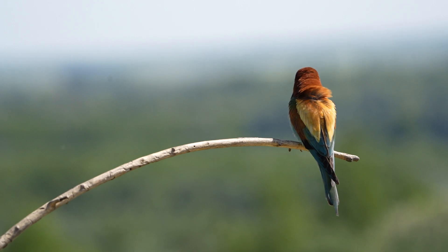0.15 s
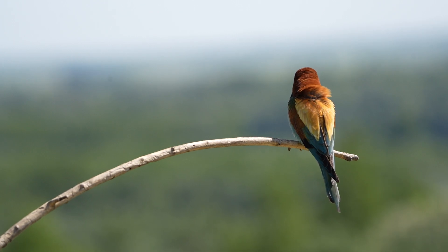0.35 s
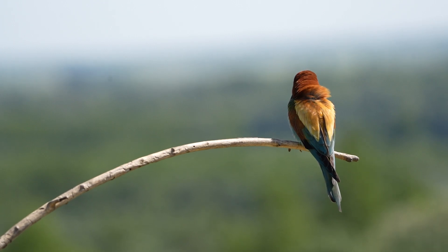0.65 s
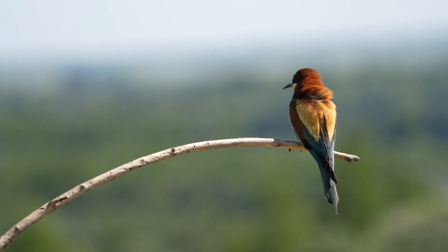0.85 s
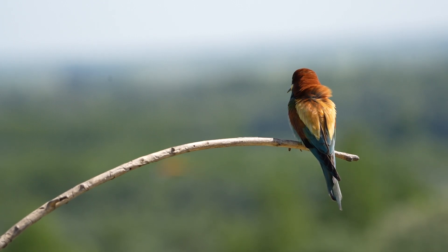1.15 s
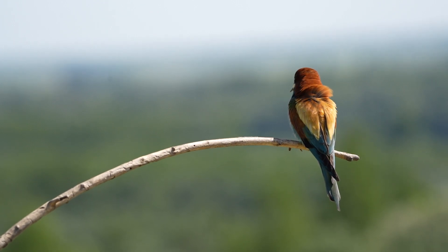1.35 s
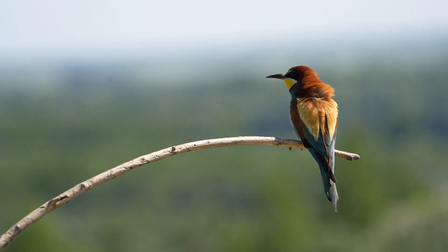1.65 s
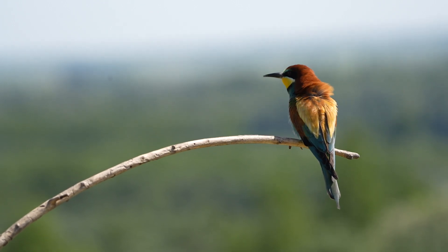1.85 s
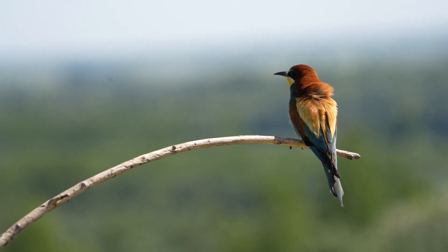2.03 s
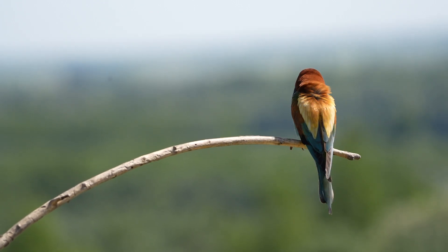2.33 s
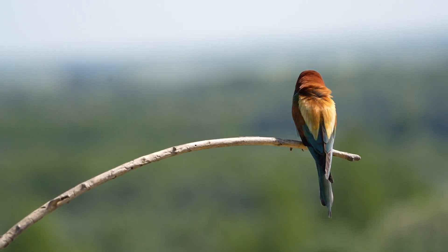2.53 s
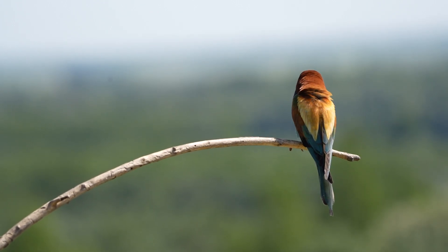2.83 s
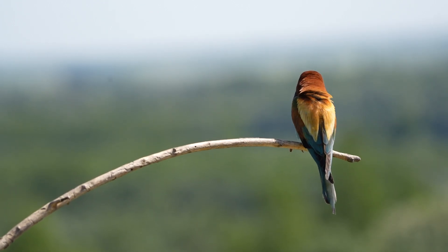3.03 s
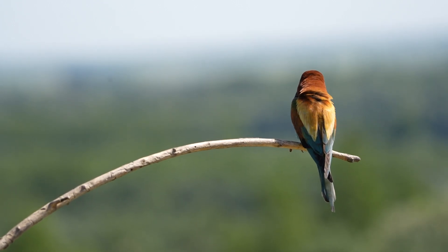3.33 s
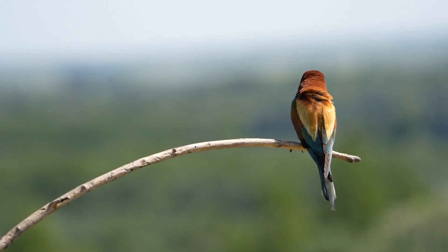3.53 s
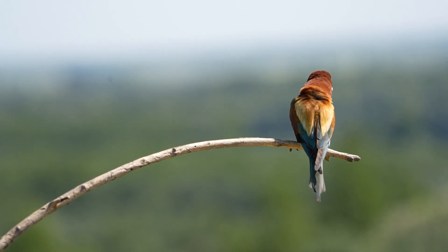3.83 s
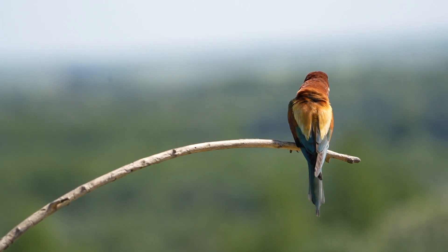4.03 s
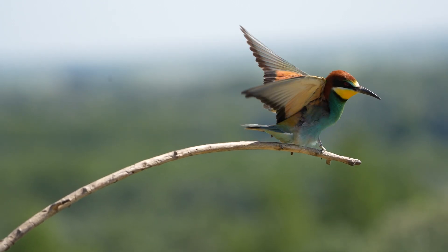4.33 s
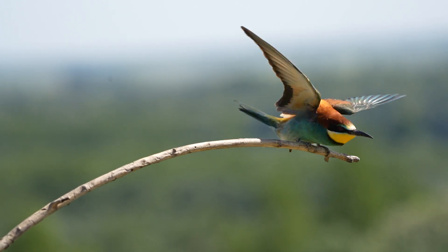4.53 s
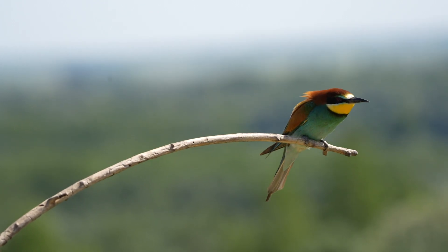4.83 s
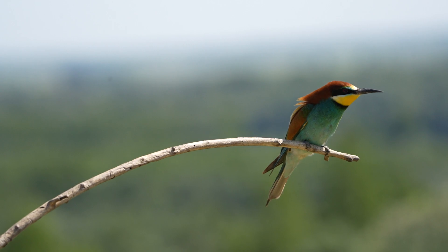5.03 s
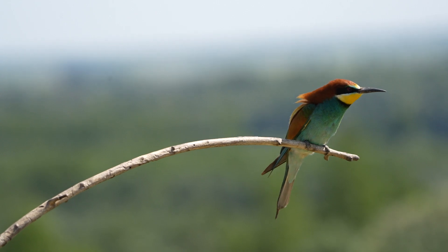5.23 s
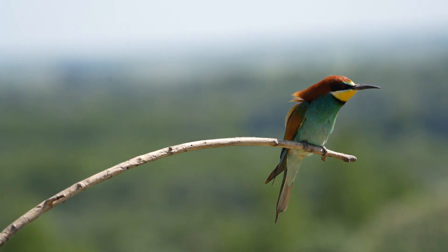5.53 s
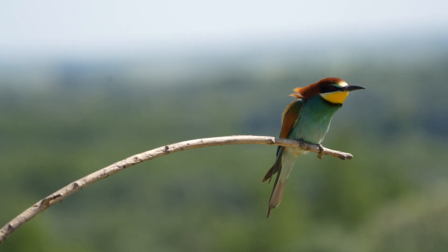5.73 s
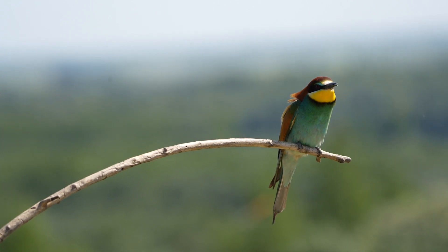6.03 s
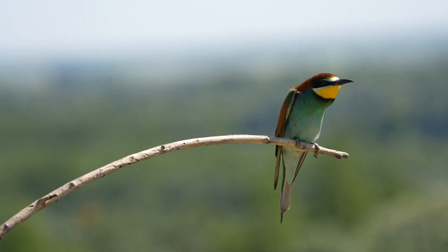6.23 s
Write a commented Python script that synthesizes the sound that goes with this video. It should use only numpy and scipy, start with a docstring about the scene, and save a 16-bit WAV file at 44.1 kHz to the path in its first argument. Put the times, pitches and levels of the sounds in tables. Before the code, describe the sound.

Outdoors in open country, a rolling bee-eater whistle and a sharp sparrow chirp begin together. Softer colony whistles scatter around, densest near three seconds, between further loud bee-eater calls and repeated chirps. Barely audible wing-like puffs, dry ticks and small rasps slip in. A steady far road murmur leans right beneath, swelling gently in the middle; stereo microphone close to the main bird, with slight hiss.

```python
"""A close bee-eater's rolling whistle and a sparrow's chirp on the left open the scene, in open countryside.
The colony answers further off in short arched whistles; all whistles are phasors with gliding pitch.
Pulse trains rasp, decaying sines tick close by, noise puffs whoosh softly, perhaps from wings.
Scattered echoes follow the birds. A distant road, shaped noise, drones on the right over microphone hiss."""
import sys
import numpy as np
from scipy import signal
from scipy.fft import rfft, irfft, next_fast_len
from scipy.io import wavfile
from scipy.ndimage import uniform_filter1d, map_coordinates

SR = 44100
rng = np.random.default_rng(int(sys.argv[2]) if len(sys.argv) > 2 else 0)


def dump_mix(stems):
    """Bounce the given channels to the path in sys.argv[1] as a 16-bit WAV at rate SR."""
    frames = np.atleast_2d(stems).T  # one column per channel
    limited = np.clip(frames, -1, 1)  # hard clip at full scale
    pcm = np.round(limited * 32767).astype(np.int16)
    wavfile.write(sys.argv[1], SR, pcm)


N = 281358

# Close bee-eater's calls: start t/s, end t/s, held f/Hz, level/dB before throat, left-right/dB, overtones/dB
NEAR_CALLS = [(-.033, 0.045, 1883, -11.5, 0.5, -53), (1.578, 1.644, 1773, -12, -0.5, -57),
              (2.238, 2.302, 1753, -10.5, -0.5, -54), (4.161, 4.264, 1846, -11.5, 0, -55.5),
              (4.336, 4.438, 1784, -23, -5, -65), (6.131, 6.236, 1803, -11, 0.5, -51)]
# Upward pitch flicks in them: crest t/s, crest f/Hz, rise/s, hold/s, fall/s, level change at crest/dB
ROLLS = [(-.002, 2355, 0.00404, .005, 0.0065, 2.5), (0.021, 2124, .004, 0.00384, 0.01, 1),
         (1.6177, 2278, 0.0053, .0035, 0.0074, -3), (2.2793, 2130, .008, 0.00088, 0.0073, -2.5),
         (4.1912, 2380, 0.0043, .006, 0.0046, 1.5), (4.213, 2277, .008, .0045, 0.012, 2),
         (4.24, 2228, 0.0083, 0.00094, 0.0095, -0.5), (4.359, 2063, 0.0022, .011, .005, 0.5),
         (4.404, 1950, 0.015, 0.013, 0.011, -0.5), (6.1606, 2344, 0.0037, .006, .006, -6.5),
         (6.184, 2276, 0.0083, 0.0049, 0.0061, -8), (6.209, 2020, 0.0088, 0.0025, .007, -5)]
# Close bee-eater's overtones: multiple of f, relative level/dB
OVERTONES = [(2, 1.5), (3, 0), (4, -14), (5, -17), (6, -19.5), (7, -22)]
# Its loudness against pitch: f/Hz, level/dB
THROAT = [(1300, -16.5), (1500, -15), (1650, -14), (1800, -4.5), (1950, 0.5), (2050, -0.5), (2250, -2),
          (2450, -4.5)]
# How the microphone ports take it: f/Hz, left-right/dB, left lead/rad
NEAR_SIDES = [(1500, -4, -.2), (1650, -6, 0), (1900, -5, -.1), (2100, -8, 0), (2250, -6, .8),
              (2400, -3, .6)]
START_HZ, SCOOP_HZ, SCOOP_S, ONSET_S = 1372, 1616, 0.00797, 0.0029  # fade in, quick scoop, then glide to held pitch
DROP_HZ, END_HZ, OVERTONES_FADE_DB = 1720, 1360, -1.5  # drop after last roll, end pitch, overtone change over a call

# Colony whistles: t/s, length/s, start f/Hz, crest f/Hz, end f/Hz, level/dB, left-right/dB, octave/dB
COLONY_CALLS = [(0.886, 0.04, 1940, 1930, 1880, -50.5, -2, -24),
                (0.949, 0.036, 1915, 1994, 1790, -45.5, -1, -17),
                (1.09, 0.03, 1820, 1940, 1780, -45, 2, -24),
                (1.196, 0.068, 1515, 1760, 1510, -48.5, -1, -24),
                (1.31, 0.03, 1400, 1770, 1680, -51, -18, -24),
                (1.674, 0.0334, 1464, 1793, 1760, -36.5, 9, -18),
                (1.742, 0.024, 1440, 1584, 1600, -37, 5, -26),
                (1.782, 0.03, 1680, 1850, 1600, -30.5, 6.5, -29),
                (2.125, 0.018, 1680, 2040, 1920, -46, -4, -24),
                (2.473, 0.024, 2160, 2460, 2040, -47.5, -14, -24),
                (2.526, 0.033, 1780, 1980, 1800, -42.5, -1, -31),
                (2.783, 0.037, 1720, 1900, 1580, -39, -18, -31),
                (2.851, 0.044, 1960, 2055, 1490, -38.5, -16, -35),
                (2.98, 0.03, 1880, 1910, 1800, -51, -2, -14),
                (3.038, 0.032, 1860, 2030, 1800, -45, -3, -26),
                (3.116, 0.0257, 1800, 2250, 1560, -31.5, -14, -37),
                (3.231, 0.046, 1600, 1800, 1510, -33.5, -20, -25),
                (3.279, 0.045, 1505, 1546, 1530, -40, -17, -27),
                (3.332, 0.03, 1620, 1714, 1440, -33.5, -16, -28),
                (3.87, 0.027, 1830, 2030, 1590, -42, -4, -24),
                (4.528, 0.014, 1400, 1590, 1750, -37, 11, -24),
                (4.541, 0.014, 1750, 2000, 1880, -35.5, 12, -28),
                (4.621, 0.036, 2070, 1930, 2020, -51, 3, -24),
                (4.657, 0.039, 1640, 2010, 1580, -41.5, -20, -24),
                (4.703, 0.022, 2040, 2070, 1990, -45, -4, -24),
                (4.728, 0.055, 1840, 2120, 1550, -40.5, -19, -24),
                (5.074, 0.037, 1730, 1830, 2150, -41, 13, -32),
                (5.109, 0.015, 1970, 1920, 1750, -37, 20, -24),
                (5.336, 0.028, 1860, 2310, 1810, -38.5, -4, -19),
                (5.376, 0.02, 1760, 2010, 1884, -42.5, -2, -24),
                (6.078, 0.051, 1684, 1780, 1720, -47.5, -2, -25),
                (6.326, 0.041, 2040, 1976, 1600, -38.5, 10, -38)]
CREST_SHARE, FAR_START_DB, FAR_END_DB, FAR_ONSET_S = .35, -2, -1.5, 0.0023  # crest at share of length; ends re crest

# Sparrow's chirps: t/s, arch/dB, burr/dB, rise/dB, pitch factor of arch and burr, pitch factor of rise
CHIRPS = [(-.01, -27.5, -29, -22, 1.02, 0.98), (1.097, -35, -32.5, -31, 0.99, .97),
          (2.213, -25, -30.5, -24, 1.006, 1.02), (3.174, -28, -31, -25, 1.036, 0.97),
          (3.815, -23.5, -25.5, -21, 1.017, 1.01), (4.571, -26, -28.5, -23.5, 1.004, .98),
          (5.254, -26.5, -28.5, -27, 1, 0.94), (5.99, -28, -27.5, -22.5, 1.01, 0.99)]
# Sparrow's three notes, before random detuning: t/s, f/Hz, level/dB
ARCH = [(0, 3960, -21), (.004, 4800, -5), (.0081, 5680, -5), (.0212, 5660, -7), (0.0266, 5780, -1),
        (0.03, 4800, -5.5), (0.0333, 3100, -20.5)]
BURR = [(0, 5420, -13), (.009, 5520, -28), (.013, 5050, -12.5), (.021, 4700, -12), (0.036, 5240, -12.5),
        (.0443, 5400, -16)]
RISE = [(0, 3200, -27), (.0088, 3800, -20), (.016, 4580, -10.5), (.0222, 4750, -5.5), (.0328, 4930, -5.5),
        (0.036, 4270, -13.5), (.0423, 4650, -34), (.0496, 5000, -25), (.056, 5460, -22)]
# Voicing of arch, burr, rise: start t/s, second voice offset f/Hz, its share, octave/dB, breath share
VOICING = [(0, -700, 0.11, -33, 0.14), (.034, 547.5, 0.62, -15.5, 0.58), (0.068, -300, 0.37, -27.5, 0.15)]
# Sparrow's side: f/Hz, left-right/dB
SPARROW_PAN = [(3500, 12.5), (4700, 17), (5200, 17.5), (5700, 0.5), (10000, -1)]

# Rasps: t/s, length/s, nominal pulse rate/Hz, pulse level/dB before colour, left-right/dB, noise factor
RASPS = [(4.126, 0.032, 1400, -46.5, -4, 0.97), (5.11, .06, 1000, -37, 9.5, 0.67),
         (5.84, .04, 690, -54, -11, 0.63)]
# Rasp filter: f/Hz, gain/dB
RASP_COLOUR = [(1500, -26), (2400, -2), (3800, -8.5), (5000, 0.5), (7500, -2), (9000, -11.5), (11000, -21),
               (12500, -32)]
# Ticks: t/s, peak level/dB, f/Hz, left-right/dB
TICKS = [(0.461, -28.5, 12000, 19), (0.841, -38, 10100, -11), (1.3312, -40, 10470, -13),
         (1.8898, -40, 9820, -12), (2.4779, -40, 6080, -2), (3.1474, -37, 9500, -11),
         (4.3307, -32, 12600, 17), (4.4365, -39.5, 7160, -6)]
# Soft noise puffs: t/s, half length/s, centre f/Hz, level/dB
PUFFS = [(3.608, .03, 2800, -54.5), (4.326, 0.041, 2900, -52.5), (5.28, 0.033, 3030, -51)]
# Reflections off trees and banks: f/Hz, t60/s
ECHO_T60 = [(1000, 0.34), (2500, 0.24), (4000, 0.096), (6000, 0.058), (12000, 0.14)]

# Road levels: t/s, tyre roar/dB, engine rumble/dB
ROAD_LEVELS = [(0.0, -43, -48), (1.33, -44, -50.5), (2.65, -43.5, -47.5), (3.25, -44, -49),
               (5.24, -43, -48.5), (6.38, -42, -44)]
# Vehicles come out from cover: t/s, half length/s, centre f/Hz, level/dB
SWELLS = [(2.15, 0.21, 930, -44.5), (2.722, .12, 850, -39)]
# Tyre roar spectrum: f/Hz, density/dB
TYRES = [(250, -33.5), (400, -11.5), (520, -9), (700, -2.5), (1050, -1), (1400, -9.5), (2400, -17),
         (5500, -26.5), (6100, -38), (9000, -73)]
# Engine rumble spectrum: f/Hz, density/dB
ENGINES = [(12, -31), (25, 0), (80, -3.5), (145, -1.5), (400, -8.5), (700, -41)]
# Left-right likeness of the road noise: f/Hz, correlation
ALIKE = [(30, 1), (100, .99), (230, 0.98), (440, 0.71), (870, 0.96), (1700, 0.71), (3300, 0.35),
         (6400, 0.38), (10000, .05)]
# Road's side: f/Hz, left-right/dB
ROAD_PAN = [(60, 0), (170, -1), (280, -3.5), (480, -5.5), (810, -9.5), (1350, -10.5), (2280, -6),
            (3500, -2), (5200, -3.5), (6400, -5.5)]
ROAD_LAG_S = .00013  # left port behind right
# Microphone hiss spectrum: f/Hz, density/dB
HISS = [(3000, -5.5), (6500, -2), (9000, -6.5), (16000, -9)]
TOP_HZ = 15790


def amp(db):
    """Gain of a level in dB."""
    return 10 ** (np.asarray(db) / 20)


def unit(x):
    """x at rms 1."""
    return x / np.sqrt(np.mean(x ** 2) + 1e-20)


def along(points, hz):
    """Interpolate (Hz, value) points on a log frequency axis."""
    f, v = np.transpose(points)
    return np.interp(np.log(hz + 1), np.log(f + 1), v)


def wobble(rate_hz, size=N):
    """Smooth random curve with rate_hz knots a second."""
    knots = rng.standard_normal(int(size * rate_hz / SR) + 4)
    return map_coordinates(knots, [np.arange(size) * rate_hz / SR])


def filtered(x, response):
    """Apply a complex response of frequency in the spectrum."""
    m = next_fast_len(N + SR // 2)
    return irfft(rfft(x, m) * response(np.fft.rfftfreq(m, 1 / SR)), m)[..., :N]


def sides(pan_db, lead_rad=0):
    """Left and right gains that share a source's power, with a phase lead on the left."""
    left = 1 / (1 + amp(-2 * np.asarray(pan_db)))
    gains = np.sqrt(2 * np.array([left, 1 - left]))
    return gains * np.exp(.5j * np.array([lead_rad, -lead_rad]))


def add(out, start_s, sound):
    """Mix a sound in from start_s, cut at both ends of the scene."""
    i = round(start_s * SR)
    sound = sound[..., max(-i, 0):N - i]
    out[..., max(i, 0):max(i, 0) + sound.shape[-1]] += sound


def whistle(rows, overtones, jitter_hz, follow=1, breath=0, fade_db=0, edge_s=.0005):
    """Syrinx tone: a turning phasor from rows (s, Hz, dB); overtones follow a share of its level changes."""
    s, hz, db = np.transpose(rows)
    t = np.arange(s[0], s[-1], 1 / SR)
    pitch_hz = uniform_filter1d(np.interp(t, s, hz), size=45) + jitter_hz * wobble(408, size=len(t))
    phase = 2 * np.pi * (np.cumsum(pitch_hz) / SR + rng.random())
    level_db = np.interp(t, s, db)

    upper = np.zeros(len(t), dtype=complex)
    for k, step_db in overtones:
        flicker_db = 5 * wobble(450, size=len(t))  # each overtone comes and goes
        upper += amp(step_db + flicker_db) * np.exp(1j * k * phase)
    follow_db = (follow - 1) * (level_db - db.max())
    upper = upper * amp(follow_db + fade_db * np.linspace(-.5, .5, len(t)))

    # breath blurs each line
    turbulence = 1 + breath * (wobble(1495, size=len(t)) + 1j * wobble(1476, size=len(t)))
    ends = np.clip(np.minimum(t - s[0], s[-1] - t) / edge_s, 0, 1)
    return amp(level_db) * ends * turbulence * (np.exp(1j * phase) + upper)


def bee_eater():
    """Rolling whistles: scoop, held pitch flicked up one to three times, drop; loudness follows pitch."""
    out = np.zeros((2, N))
    for start, end, held_hz, db, shift_db, upper_db in NEAR_CALLS:
        rolls = [roll for roll in ROLLS if start <= roll[0] < end]
        t = np.arange(start, end, 1 / SR)
        first_crest, _, lead_in, *_ = rolls[0]
        last_crest, _, _, linger, lead_out, _ = rolls[-1]
        drop = last_crest + linger
        line_hz = np.interp(t, [start, start + SCOOP_S, first_crest - lead_in, drop, drop + lead_out, end],
                            [START_HZ, SCOOP_HZ, held_hz, held_hz, DROP_HZ, END_HZ])
        pitch_hz, level_db = line_hz, db
        for crest, crest_hz, rise, hold, fall, change_db in rolls:
            flick = np.interp(t, [crest - rise, crest, crest + hold, crest + hold + fall], [0, 1, 1, 0])
            pitch_hz = pitch_hz + flick * (crest_hz - line_hz)
            level_db = level_db + flick * change_db
        rows = np.transpose([t, pitch_hz, level_db + along(THROAT, pitch_hz)])
        overtones = [(k, step_db + upper_db - db) for k, step_db in OVERTONES]
        tone = whistle(rows, overtones, jitter_hz=3.6, follow=0.09, breath=0.0049,
                       fade_db=OVERTONES_FADE_DB, edge_s=ONSET_S)
        add(out, start, np.real(sides(shift_db)[:, None] * tone))
    f, pan_db, lead_rad = np.transpose(NEAR_SIDES)
    return filtered(out, lambda hz: sides(np.interp(hz, f, pan_db), np.interp(hz, f, lead_rad)))


def colony():
    """Short arched whistles; a bird to one side leads in phase at that port."""
    out = np.zeros((2, N))
    for s, length, start_hz, crest_hz, end_hz, db, pan_db, octave_db in COLONY_CALLS:
        u = np.linspace(0, 1, round(length * SR))
        arch = np.sin(np.pi / 2 * np.interp(u, [0, CREST_SHARE, 1], [0, 1, 0]))
        rising = u < CREST_SHARE
        edge_hz = np.where(rising, start_hz, end_hz)
        edge_db = np.where(rising, FAR_START_DB, FAR_END_DB)
        rows = np.transpose([u * length, edge_hz + arch * (crest_hz - edge_hz), db + (1 - arch) * edge_db])
        tone = whistle(rows, [(2, octave_db), (3, octave_db - 3)], jitter_hz=23, follow=0.65,
                       breath=0.053, edge_s=FAR_ONSET_S)
        add(out, s, np.real(sides(pan_db, lead_rad=0.11 * pan_db)[:, None] * tone))
    return out


def sparrow():
    """Each chirp is an arch, a burr and a fluttering rise, of two voices mixing in the throat."""
    out = np.zeros(N)
    for s, *levels_db, high, low in CHIRPS:
        notes = zip([ARCH, BURR, RISE], [high, high, low], levels_db, VOICING)
        for shape, factor, db, (after, apart_hz, share, octave_db, breath) in notes:
            detune = rng.standard_normal((len(shape), 3)) * [0, 35, 1.2]  # s, Hz, dB: no two alike
            rows = np.array(shape) * [1, factor, 1] + detune
            first = whistle(rows, [], jitter_hz=47, breath=breath)
            second = share * whistle(rows + [0, apart_hz, 0], [], jitter_hz=45, breath=breath)
            voices = first + second
            blurred_octave = amp(octave_db) * voices ** 2
            add(out, s + after, amp(db) * np.real(voices + blurred_octave))
    return filtered(out, lambda hz: sides(along(SPARROW_PAN, hz), lead_rad=1.62 + 0 * hz))


def rasps():
    """Small bird's rasp: a train of sharp pulses that quickens, slows and breaks into noise."""
    out = np.zeros((2, N))
    for s, length, rate_hz, db, pan_db, noisy in RASPS:
        u = np.linspace(0, 1, round(length * SR))
        speed = .85 + .3 * np.sin(np.pi * u) + 0.059 * wobble(293, size=len(u))
        turns = np.cumsum(rate_hz / SR * speed)
        pulses = np.cos(2 * np.pi * np.arange(1, 14)[:, None] * turns).sum(axis=0)  # 13 harmonics
        pulses = unit(pulses) * amp(2.2 * wobble(890, size=len(u)))
        noise = noisy * (.4 + 2 * u) * rng.standard_normal(len(u))
        envelope = np.sin(np.pi * u ** 0.6) ** 1.03
        add(out, s, amp(db) * np.real(sides(pan_db))[:, None] * envelope * (pulses + noise))
    return filtered(out, lambda hz: amp(along(RASP_COLOUR, hz)))


def ticks():
    """Tiny dry ticks: sines that decay 60 dB in 1.3 ms."""
    out, t = np.zeros((2, N)), np.arange(SR // 200) / SR
    for s, db, hz, pan_db in TICKS:
        ring = np.sin(2 * np.pi * hz * t) * amp(db - 60 * t / 0.0013)
        add(out, s, np.real(sides(pan_db))[:, None] * ring)
    return out


def puffs():
    """Brief soft whooshes, perhaps of wings: band noise under bell envelopes."""
    t, out = np.arange(N) / SR, np.zeros((2, N))
    for at, half, centre_hz, db in PUFFS:
        white = rng.standard_normal((2, N))
        noise = unit(filtered(white, lambda hz: np.exp(-.5 * ((hz - centre_hz) / 450) ** 2)))
        out = out + amp(db) * np.exp(-.5 * ((t - at) / half) ** 2) * noise
    return out


def echo(x):
    """Scattered reflections: each frequency dies at its own speed, new pattern every quarter second."""
    out, step = np.zeros((2, N)), SR // 4
    for i in range(0, N, step):
        hz, t, z = signal.stft(rng.standard_normal((2, SR // 3)), SR, nperseg=256)
        decay = amp(-60 * t / along(ECHO_T60, hz)[:, None])
        tail = signal.istft(z * decay, SR, nperseg=256)[1]
        tail = tail / np.linalg.norm(tail[0])
        add(out, i / SR + .006, signal.fftconvolve(x[:, i:i + step], tail, axes=1))
    return out


def rush(spectrum, patchy_db):
    """Stereo road noise, its mean channel at rms 1, with patches of random gain in time and frequency."""
    z = signal.stft(rng.standard_normal((2, N)), nperseg=512)[2]
    field = uniform_filter1d(rng.standard_normal(z.shape[1:]), 5, 0)
    field = uniform_filter1d(field, 16, 1)
    pair = signal.istft(z * amp(patchy_db * unit(field)), nperseg=512)[1][:, :N]

    def common_and_side(hz):
        turn = np.arccos(np.clip(along(ALIKE, hz), -1, 1)) / 2
        return amp(along(spectrum, hz)) * [np.cos(turn), np.sin(turn)]

    def placement(hz):
        lag_rad = 2 * np.pi * hz * ROAD_LAG_S * (hz > 700)
        return sides(along(ROAD_PAN, hz), -lag_rad)

    common, side = filtered(pair, common_and_side)
    both = filtered(np.array([common + side, common - side]), placement)
    return both / np.sqrt(np.mean(both.mean(axis=0) ** 2))


def road():
    """Tyre roar and engine rumble swell as vehicles pass far away."""
    s, tyres_db, engines_db = np.transpose(ROAD_LEVELS)
    t = np.arange(N) / SR
    tyres = amp(np.interp(t, s, tyres_db) + 0.18 * wobble(4.58)) * rush(TYRES, patchy_db=1.23)
    for at, half, centre, db in SWELLS:
        band = [(20, -120), (.75 * centre, -6), (centre, 0), (1.25 * centre, -5), (3 * centre, -120)]
        tyres = tyres + amp(db) * np.exp(-.5 * ((t - at) / half) ** 2) * rush(band, patchy_db=0.0)
    engines = amp(np.interp(t, s, engines_db)) * rush(ENGINES, patchy_db=1.64)
    return tyres + engines


def scene():
    """Birds with their echoes, ticks and puffs over the road."""
    near, flock, small = bee_eater(), colony(), sparrow() + rasps()
    echoes = echo(amp(-25.5) * near + amp(-16) * flock + amp(-8) * small)
    return near + flock + small + ticks() + puffs() + echoes + road()


def record(dry):
    """Each microphone port adds its own hiss; nothing is kept from TOP_HZ up."""
    white = rng.standard_normal((2, N))
    hiss = amp(-62.5) * unit(filtered(white, lambda hz: amp(along(HISS, hz)) * (hz > 1500)))
    return filtered(dry + hiss, lambda hz: hz < TOP_HZ)


dry = scene()
out = record(dry)
dump_mix(out)
```